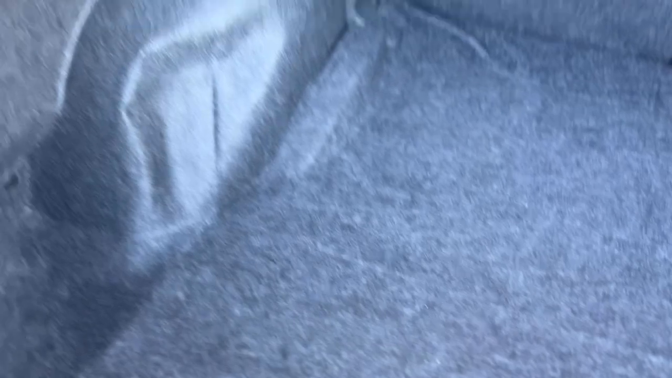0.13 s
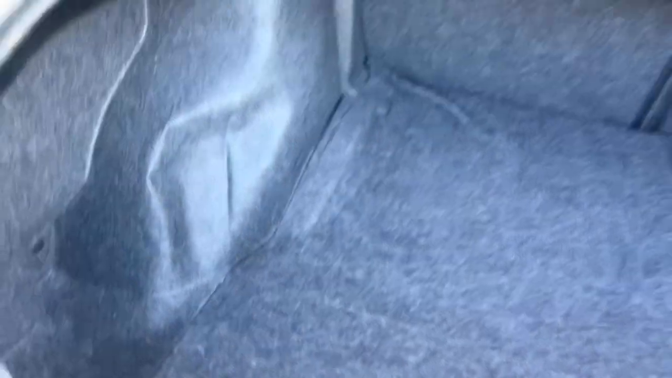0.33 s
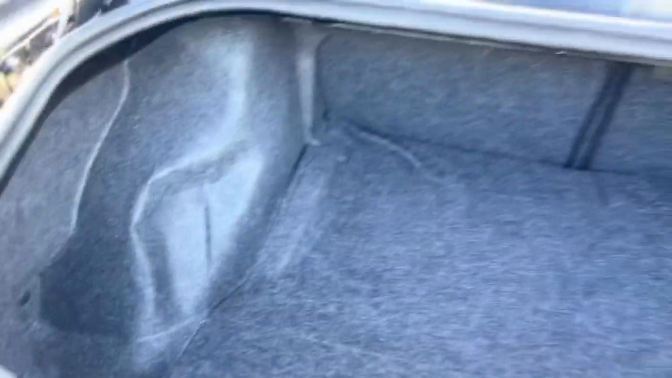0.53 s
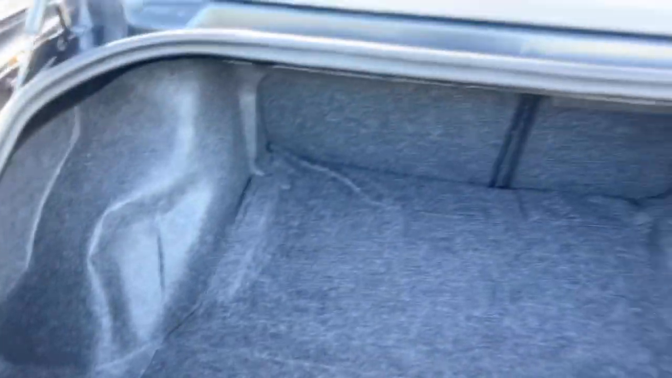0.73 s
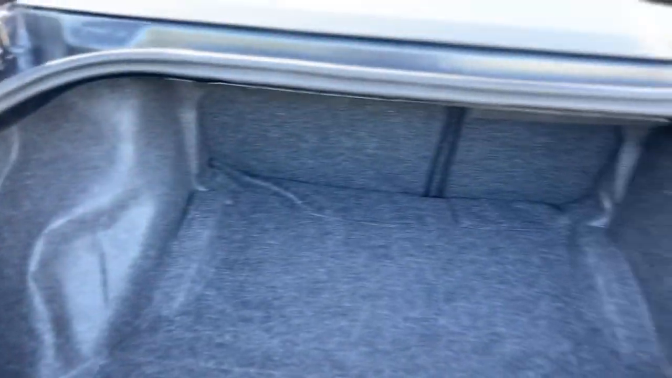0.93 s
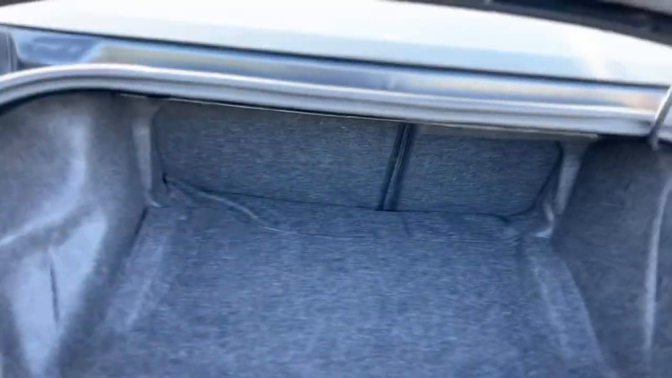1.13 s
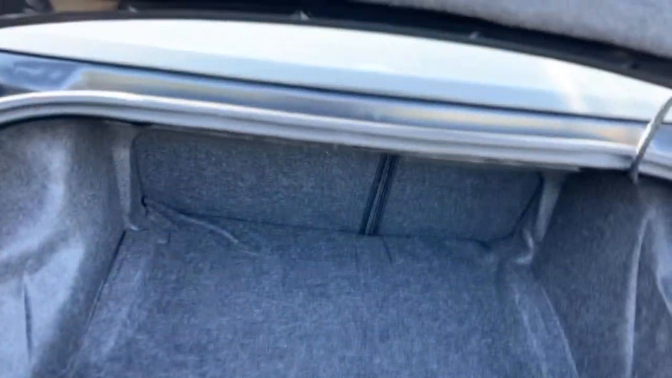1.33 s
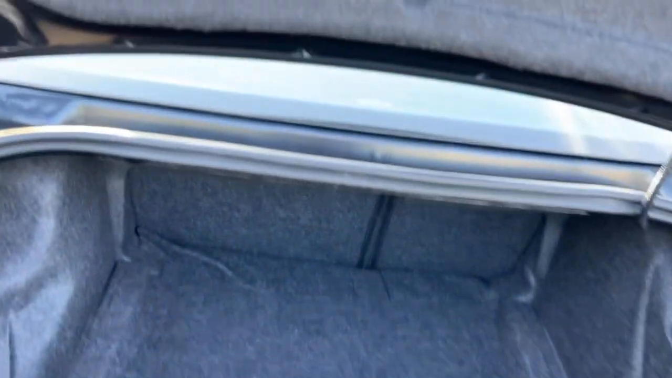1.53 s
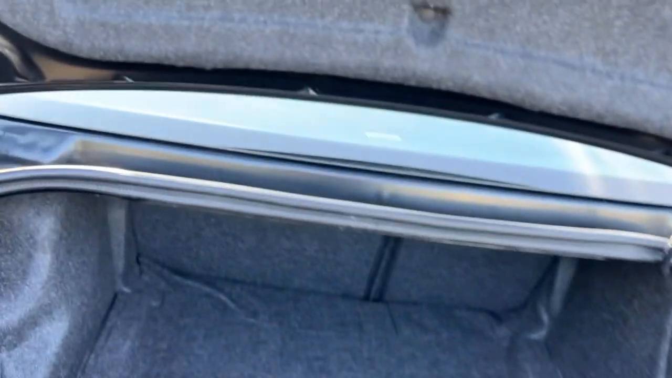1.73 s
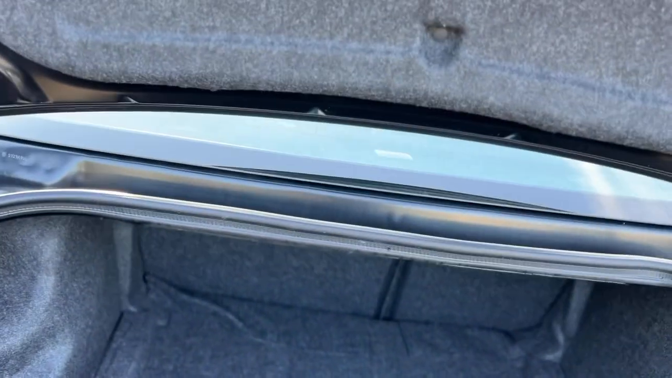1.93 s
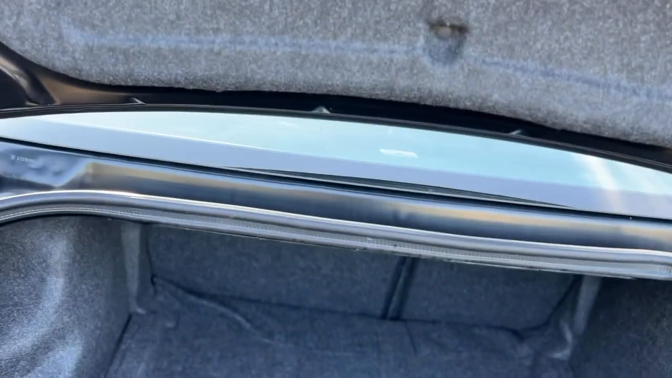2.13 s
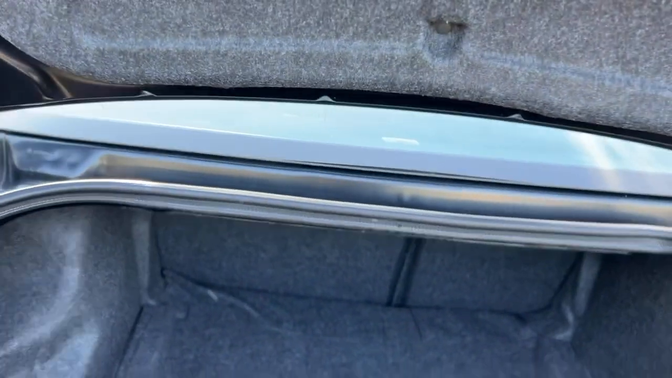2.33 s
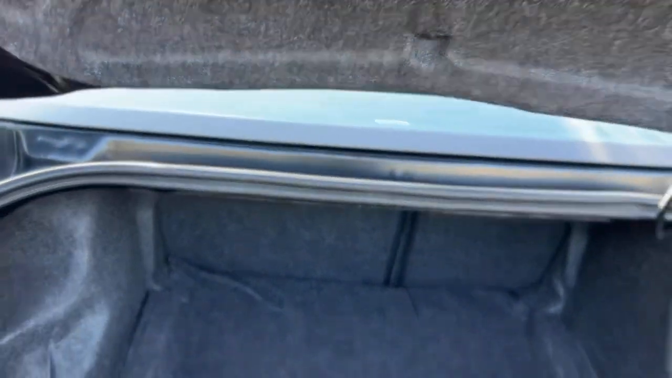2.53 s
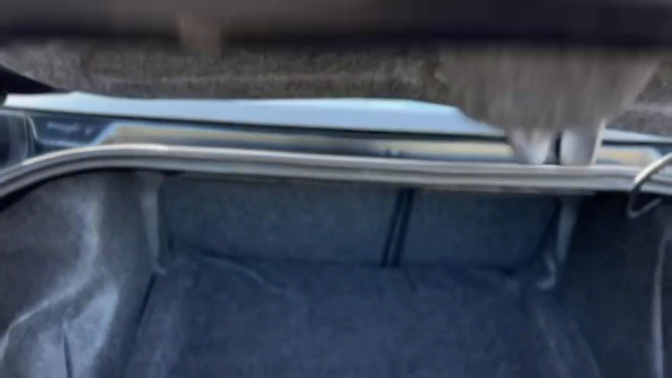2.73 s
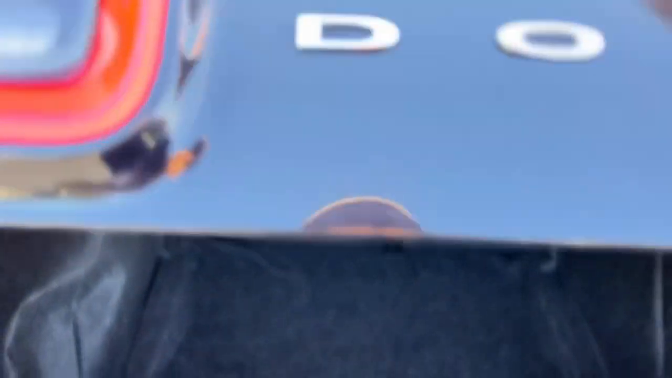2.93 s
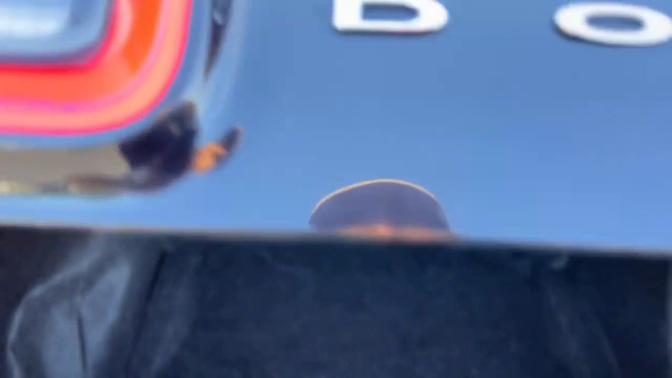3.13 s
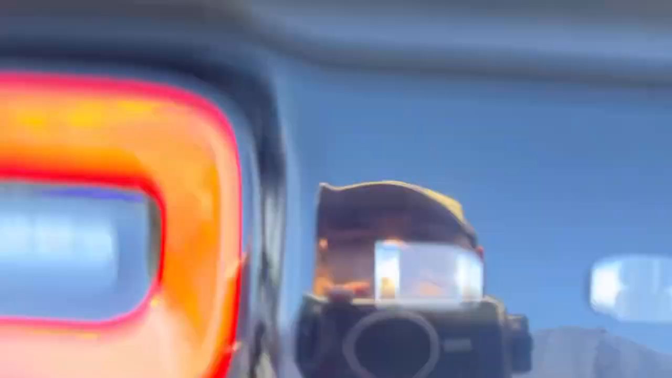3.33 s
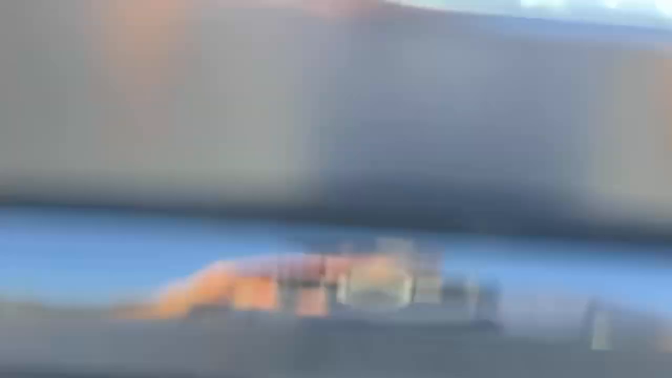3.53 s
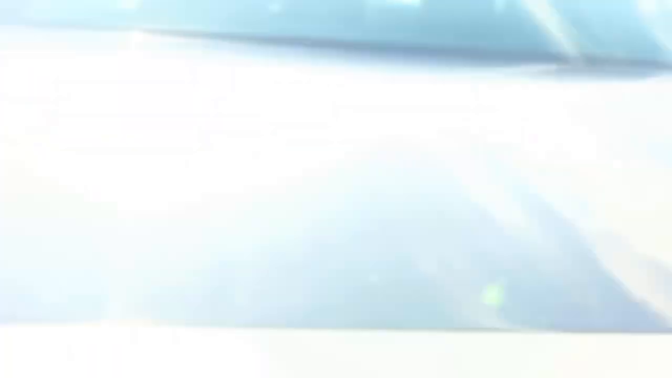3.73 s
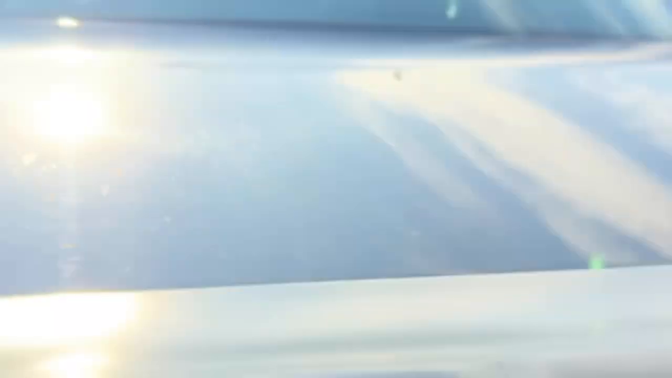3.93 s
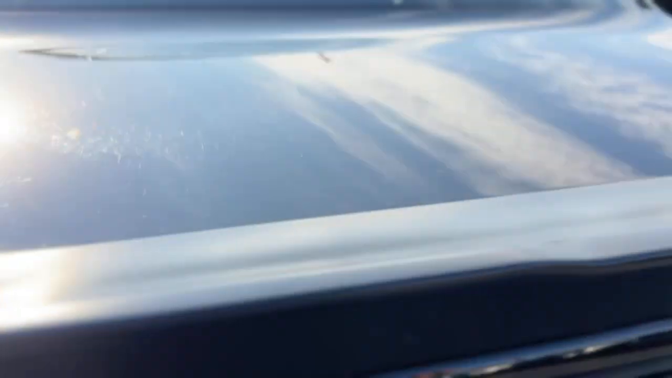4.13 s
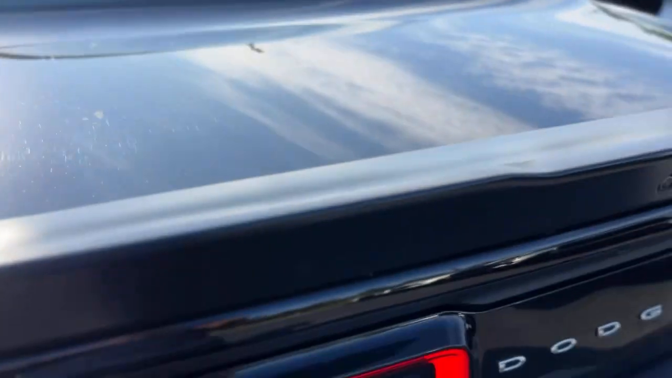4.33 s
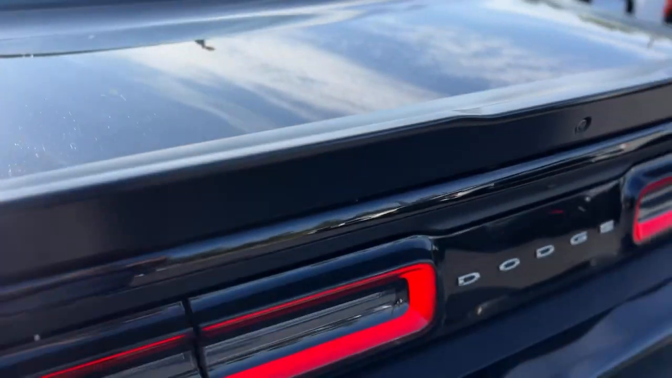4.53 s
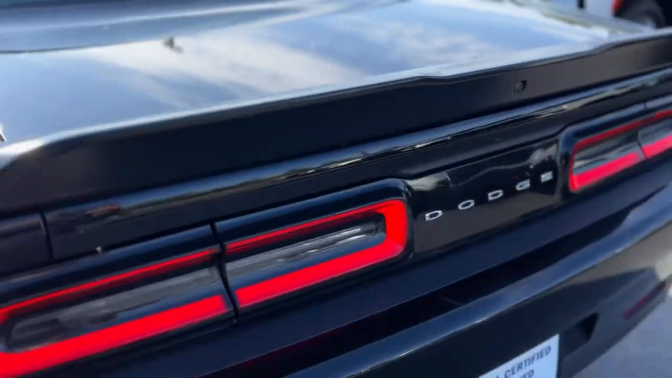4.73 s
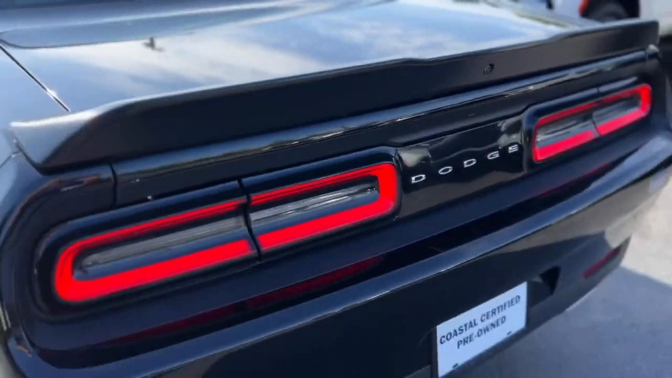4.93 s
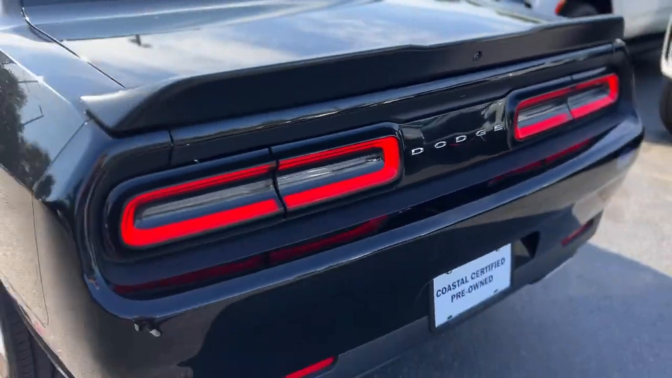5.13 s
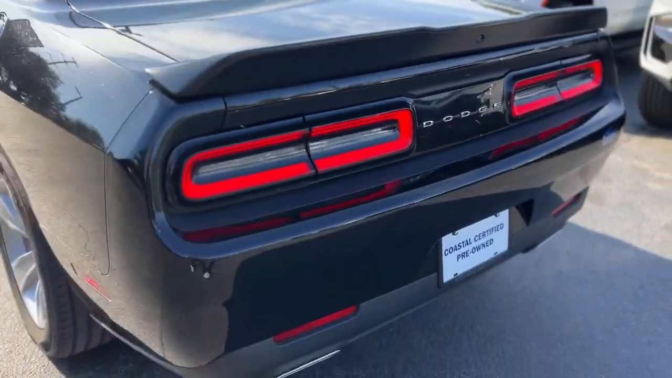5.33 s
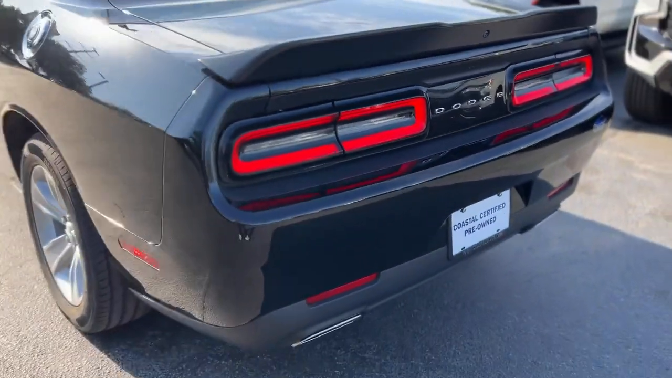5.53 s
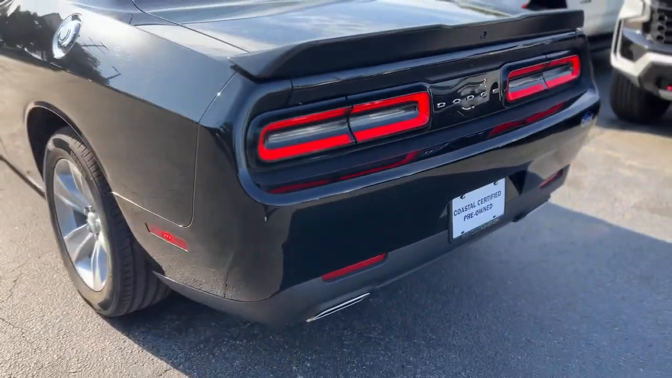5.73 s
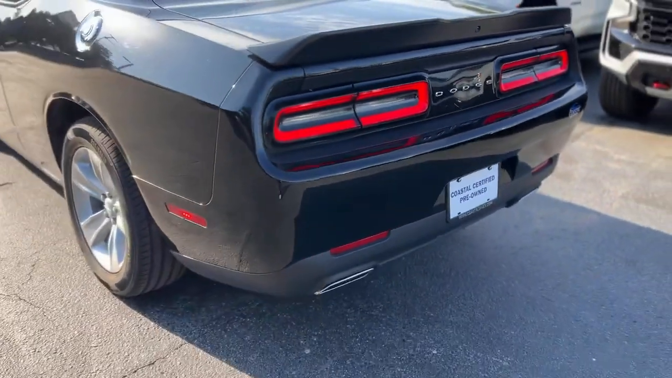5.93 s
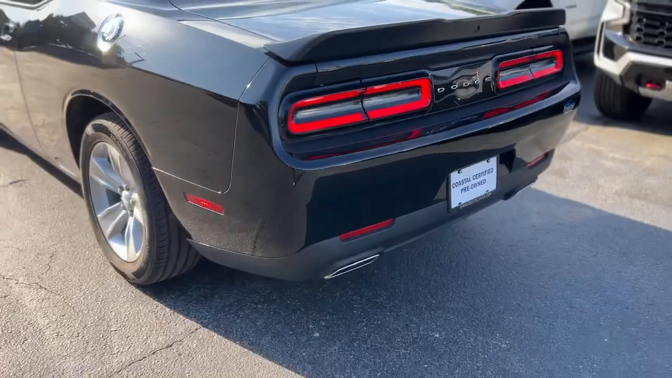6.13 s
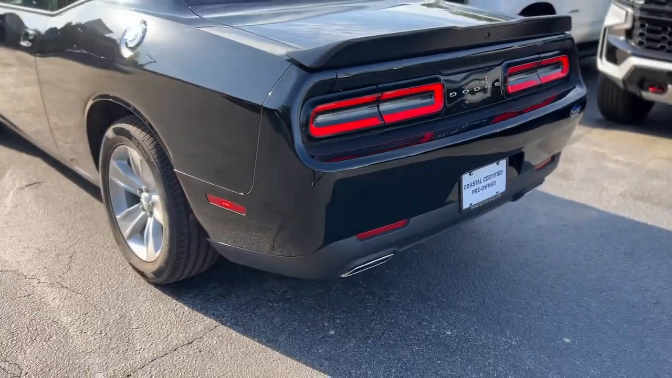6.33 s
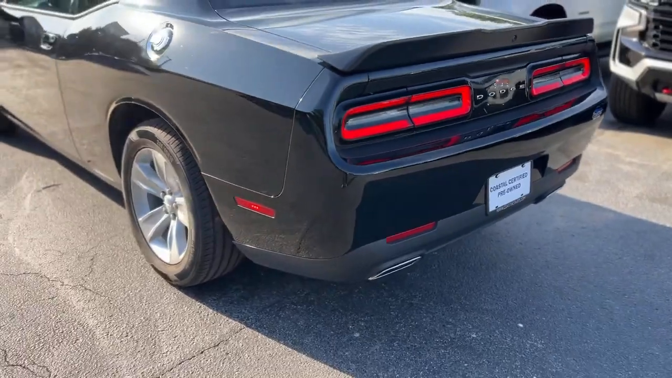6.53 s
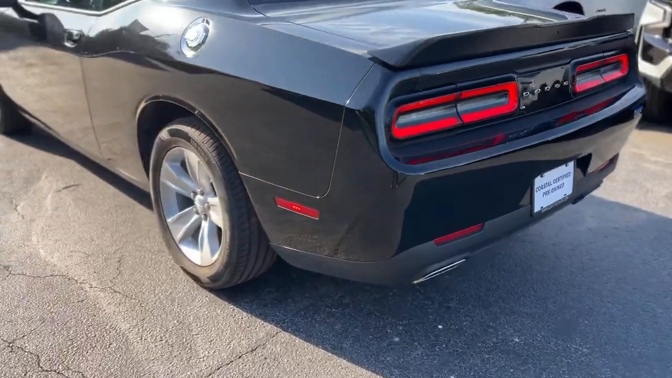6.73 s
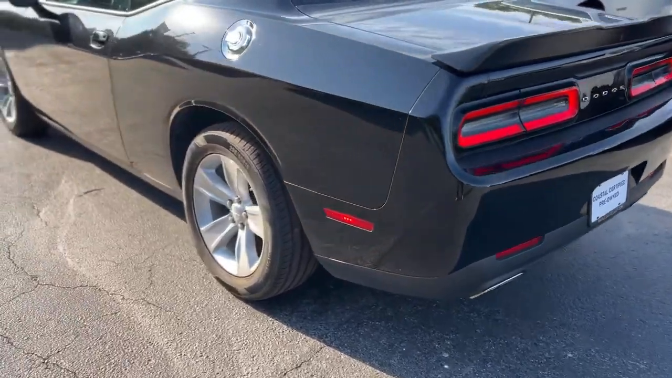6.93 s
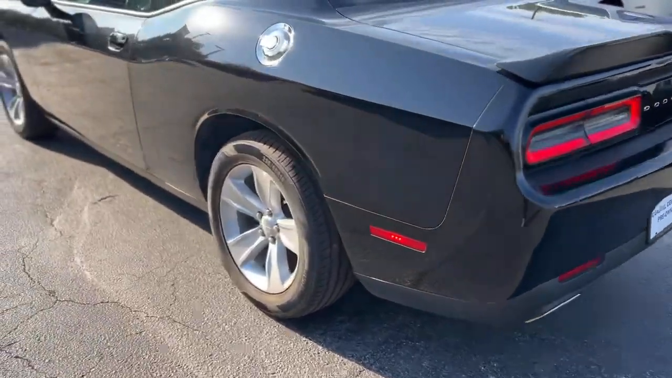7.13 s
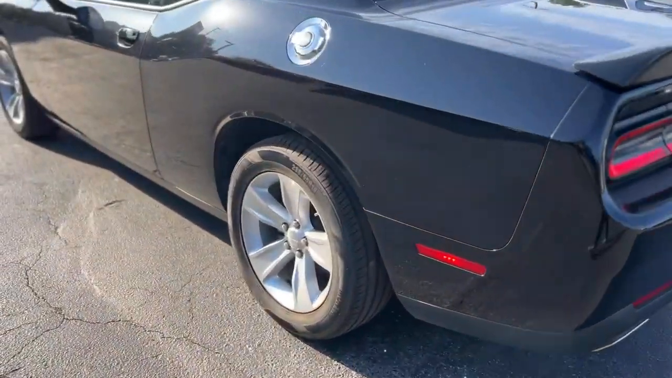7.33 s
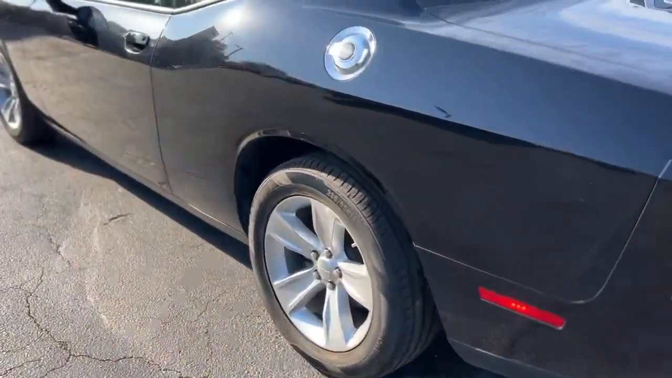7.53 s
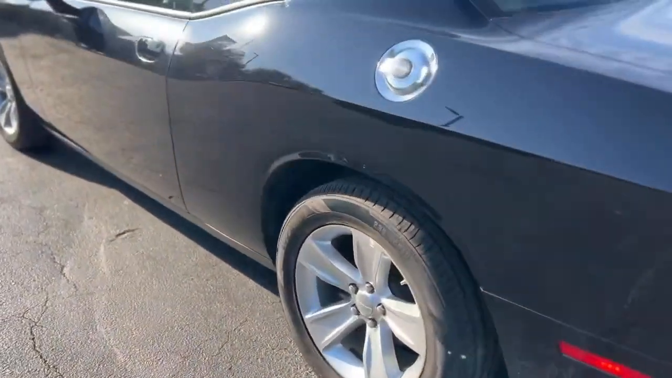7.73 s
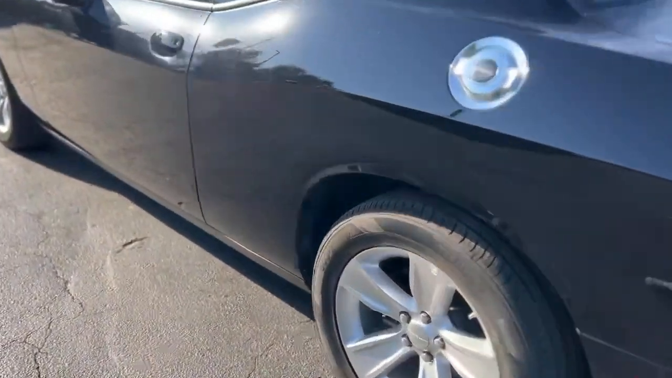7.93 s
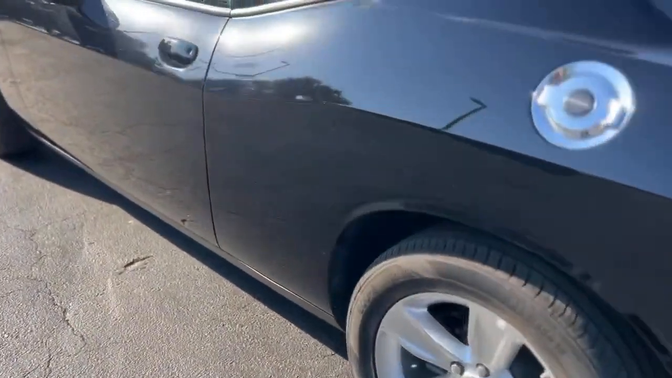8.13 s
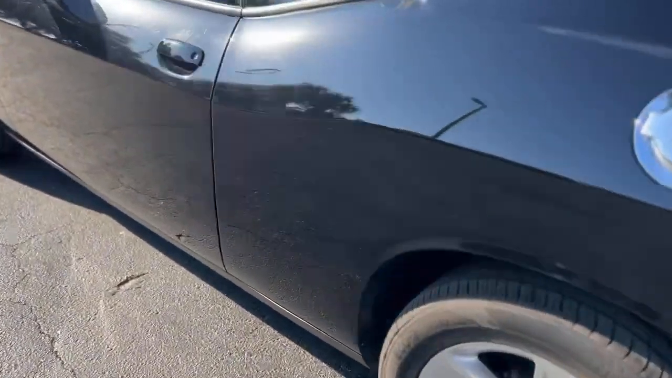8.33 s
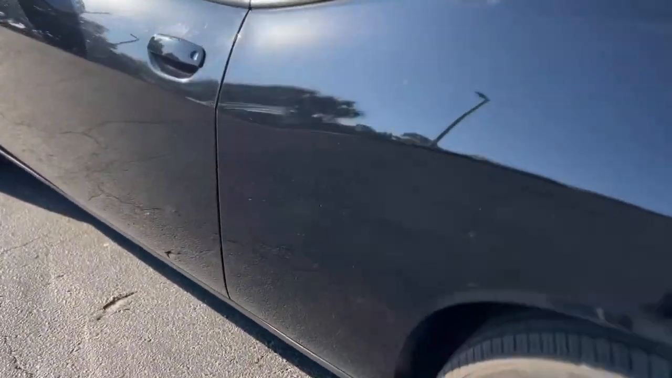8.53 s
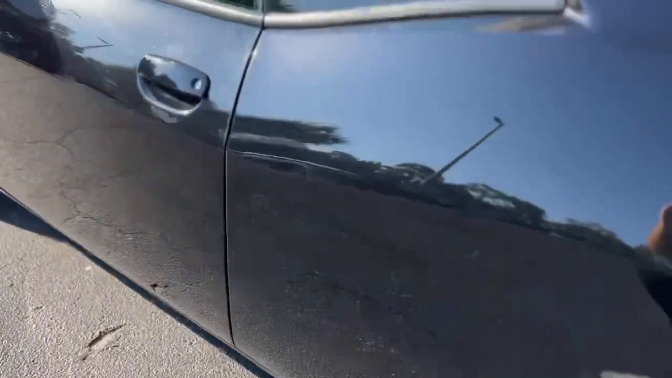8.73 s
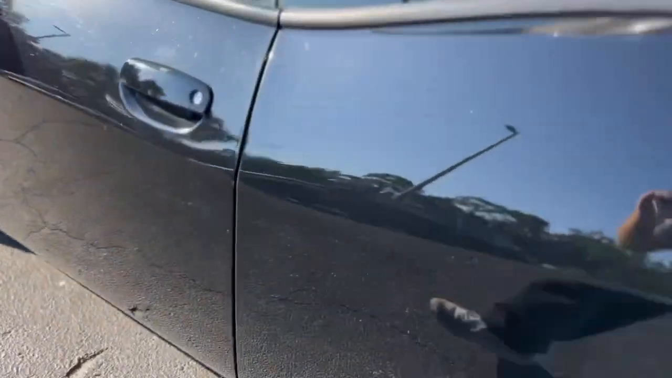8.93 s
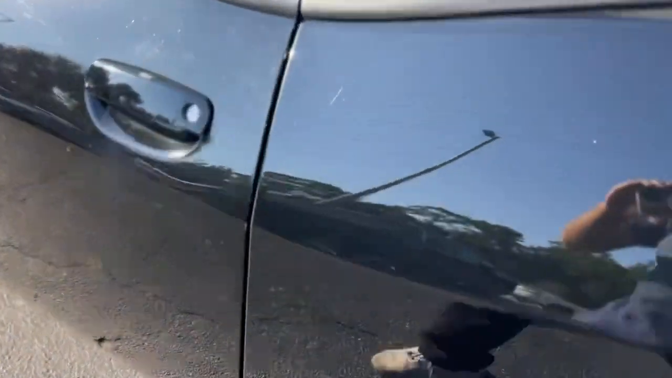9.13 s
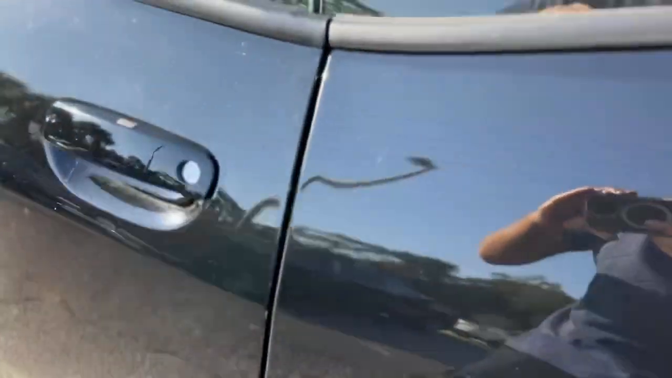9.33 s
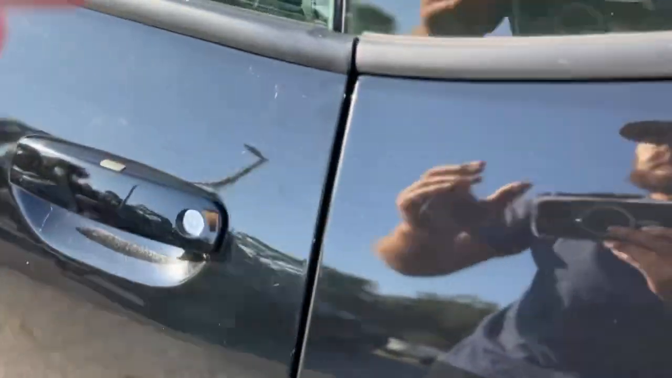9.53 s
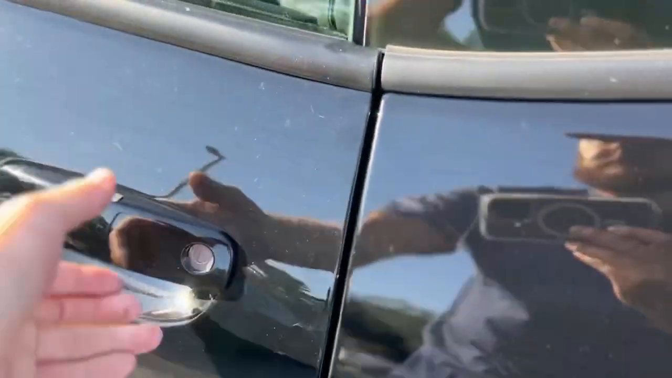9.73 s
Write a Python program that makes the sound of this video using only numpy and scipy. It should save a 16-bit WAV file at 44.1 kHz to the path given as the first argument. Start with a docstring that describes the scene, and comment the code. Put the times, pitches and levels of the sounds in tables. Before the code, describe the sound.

A hand-held microphone at an open car trunk picks up low distant traffic, faint vehicle hum and soft air thumps. Small clicks and hollow ticks come from the hinge and trim. Then the lid slams: a loud, dense thud with metallic clang and latch clank, shuddering briefly. Afterward come a few low wind buffets, and quiet traffic with a faint idling engine continues outdoors.

```python
"""Distant traffic, an idling engine and soft buffets of air on a hand-held microphone, with small clicks;
then a car's trunk lid is slammed: latch meets striker, the lid bottoms on its seal, panels and trim shudder.
Traffic and breeze are coloured noise under slow gains, engines are wavering sines, buffets are short eddies.
Clicks are noise snaps over damped modes; the slam stacks noise bursts, ringing lid modes and a push of air."""
import sys
import numpy as np
from scipy import signal
from scipy.fft import rfft, irfft
from scipy.io import wavfile
from scipy.ndimage import uniform_filter1d

SR = 44100
rng = np.random.default_rng(int(sys.argv[2]) if len(sys.argv) > 2 else 0)


def master(y):
    """Save y as 16-bit WAV."""
    cut = np.clip(np.atleast_2d(y).T, -1, 1)
    pcm = np.round(cut * 32767)  # scale
    wavfile.write(sys.argv[1], SR, pcm.astype(np.int16))


N = 435708
TIME = np.arange(N) / SR


def amp(db):
    """Turns decibels into gain."""
    return 10 ** (np.asarray(db) / 20)


def unit(x):
    """Scales a sound to rms 1."""
    return x / np.sqrt(np.mean(x ** 2) + 1e-20)


def read(points, hz):
    """Reads a spectrum table on a log-frequency axis."""
    f, value = np.transpose(points)
    return np.interp(np.log(hz + 1), np.log(f + 1), value)


def add(mix, s, sound):
    """Mixes a sound in, starting at s seconds."""
    part = mix[round(s * SR):][:len(sound)]
    part += sound[:len(part)]


def noise(colour, size, tilt_db=0):
    """Noise of rms 1 with the given spectrum, tilted by tilt_db per octave above 1 kHz."""
    hz = np.fft.rfftfreq(size, 1 / SR)
    octaves = np.log2(np.maximum(hz, 1000) / 1000)
    spectrum = rfft(rng.standard_normal(size))
    return unit(irfft(spectrum * amp(read(colour, hz) + tilt_db * octaves), size))


def drift(per_s):
    """Slow random wander of rms 1: white noise averaged twice over 1 / per_s seconds."""
    width = max(int(SR / per_s), 1)
    smooth = uniform_filter1d(rng.standard_normal(N), width, mode="wrap")
    return unit(uniform_filter1d(smooth, width, mode="wrap"))


def swell(s, length):
    """A bell-shaped gain that peaks at s; over its length it stays above 0.6."""
    return np.exp(-2 * ((TIME - s) / length) ** 2)


def dying(t, t60):
    """Exponential decay by 60 dB in t60 seconds."""
    return np.exp(-np.log(1000) * t / t60)


def ring(modes, t):
    """Damped resonances, each a dying sine; neighbours start in opposite directions."""
    out = 0
    for k, (hz, db, t60) in enumerate(modes):
        out = out + (-1) ** k * amp(db) * dying(t, t60) * np.sin(2 * np.pi * hz * t)
    return out


# Start and end of each of the microphone's four moves, alternating, in seconds.
MOVES_S = [1.0, 1.7, 3.4, 4.3, 6.6, 8.2, 8.8, 9.4]


def place():
    """Where the microphone is, counted along its five resting places."""
    return np.interp(TIME, MOVES_S, [0, 1, 1, 2, 2, 3, 3, 4])


# Street levels inside the trunk, under the lid, behind the car, beside it and at the door.
# Each row: traffic roar in dB, tyre hiss in dB, street rumble in dB.
PLACE_LEVELS = [(-53, -68, -54.5), (-51.5, -67.5, -52.5), (-55, -73, -57.5), (-52.5, -70, -57),
                (-52.5, -69.8, -59)]


def street_levels():
    """Roar, hiss and rumble in dB, blended along the microphone's way."""
    where = place()
    return [np.interp(where, np.arange(len(PLACE_LEVELS)), db) for db in np.transpose(PLACE_LEVELS)]


# Colour of the traffic as the car's body screens and reflects it, at the five places in turn.
# Each row: frequency in Hz, relative level in dB per Hz.
INSIDE_COLOUR = [(180, -42), (300, -12), (391, -11), (453, -4), (492, -7.5), (1020, -6), (1240, -12),
                 (1370, -9), (1560, -15), (2360, -18), (3630, -30.5), (15500, -52.5)]
UNDER_LID_COLOUR = [(180, -24), (300, -6), (348, -12), (397, -12.5), (439, -2.5), (476, -7), (610, -4),
                    (708, -3), (1120, -4), (1370, -9.5), (1490, -15.5), (2360, -21), (3690, -32.5),
                    (5050, -40.5), (15500, -57)]
BEHIND_COLOUR = [(180, -33), (300, -4.5), (360, -9.5), (417, -3), (476, -6.5), (953, -1.5), (1810, -12.5),
                 (2140, -17), (2520, -19), (3870, -32), (5050, -32), (15500, -47.5)]
BESIDE_COLOUR = [(180, -35), (300, -1), (337, -8), (372, -1.5), (397, -7), (453, -6), (492, -7.5),
                 (610, -2.5), (877, -2.5), (1160, -1), (2170, -14), (3940, -31.5), (8700, -35.5),
                 (15500, -46)]
AT_DOOR_COLOUR = [(180, -40), (300, -5), (366, -0.5), (431, -8), (600, 0), (863, -1), (1030, -3),
                  (1200, -3.5), (2520, -22), (2980, -24.5), (3230, -28.5), (8560, -40.5), (15500, -48)]
# Cars going by on the far road.
# Each row: peak in seconds, length in seconds, lift of the roar in dB, lift of the tyre hiss in dB.
CAR_PASSES = [(.62, 0.26, 1.8, 1), (1.75, 0.48, 1.5, 1.9), (2.55, 0.87, 0, 2.5), (3.85, 0.52, 2, 0)]


def traffic():
    """Roar and tyre hiss lift as cars go by, and change colour as the microphone moves round the car."""
    roar_db, hiss_db, _ = street_levels()
    for s, length, roar_lift_db, hiss_lift_db in CAR_PASSES:
        bell = swell(s, length)
        roar_db = roar_db + roar_lift_db * bell
        hiss_db = hiss_db + hiss_lift_db * bell
    roar_gain = amp(roar_db + 0.52 * drift(17))
    hiss_gain = amp(hiss_db + 0.54 * drift(9.4))

    split = signal.butter(4, 2100, fs=SR, output="sos")  # roar below 2100 Hz, hiss above
    out, where = np.zeros(N), place()
    colours = [INSIDE_COLOUR, UNDER_LID_COLOUR, BEHIND_COLOUR, BESIDE_COLOUR, AT_DOOR_COLOUR]
    for k, colour in enumerate(colours):
        wash = noise(colour, N)
        roar = signal.sosfiltfilt(split, wash)
        hiss = wash - roar
        nearness = np.sqrt(np.maximum(1 - abs(where - k), 0))  # equal-power crossfade
        out += nearness * (roar_gain * unit(roar) + hiss_gain * unit(hiss))
    return out


# Spectra of the gusts and of the street rumble.
# Each row: frequency in Hz, relative level in dB per Hz.
GUST_COLOUR = [(15, -6), (40, 0.5), (70, 3), (110, -4.5), (250, -28), (800, -61.5)]
RUMBLE_COLOUR = [(60, -24), (95, 2), (130, 1.5), (175, -2), (260, -8), (500, -20.5), (1200, -63)]
# The air stirring as the microphone is carried about.
# Each row: peak in seconds, length in seconds, level in dB.
GUST_SWELLS = [(0.357, 0.27, -54.5), (.8, .5, -55.5), (1.28, 0.23, -52.5), (1.772, 0.47, -54),
               (3.35, 0.41, -56.5), (4.453, 0.14, -50), (4.717, 0.11, -51), (5.045, 0.38, -55),
               (5.75, 0.64, -57.5), (7.25, 0.55, -62), (9.2, 1, -62.5)]
CALM_DB, GUST_RUMBLE_DB = -63.5, -1  # air between gusts; rumble a gust raises, relative to the gust


def breeze():
    """Lumpy gusts on the microphone over the steadier street rumble, which each gust lifts a little."""
    _, _, street_db = street_levels()
    stir = sum(amp(db) * swell(s, length) for s, length, db in GUST_SWELLS)
    # powers add, so gains combine as a hypotenuse
    gust_gain = np.hypot(amp(CALM_DB), stir) * amp(1.5 * drift(22))
    rumble_gain = np.hypot(amp(street_db), amp(GUST_RUMBLE_DB) * stir) * amp(1.4 * drift(18))
    return noise(GUST_COLOUR, N) * gust_gain + noise(RUMBLE_COLOUR, N) * rumble_gain


def engine(hz, gain, waver):
    """One sine line of an engine; waver is the rms share by which its pitch wanders."""
    turns = np.cumsum(hz * (1 + waver * drift(12.5))) / SR
    flutter = amp(2 * drift(13))
    return np.sqrt(2) * gain * flutter * np.sin(2 * np.pi * turns)


# An idling engine, heard more or less as the car screens it.
# Each row: time in seconds, level in dB.
IDLE_LEVEL = [(0, -77), (3.3, -66), (5, -57), (6.2, -63.5), (7.2, -60), (8, -55.5), (9.88, -63)]
IDLE_HZ = 103.7
# Engine notes of far vehicles.
# Each row: peak in seconds, length in seconds, pitch at the peak in Hz, level in dB.
FAR_NOTES = [(.08, 0.29, 463, -60), (0.601, 0.86, 318, -60.5), (1.749, 0.43, 444, -56.5),
             (2.152, 0.45, 439, -60.5), (.2, 0.55, 161, -59), (2.104, 1.1, 123.9, -56),
             (2.1, 1.1, 312.7, -67.5)]
NOTE_SAG_PER_S = 0.022  # the vehicles slow: share of the pitch lost each second


def engines():
    """One engine idles around a steady pitch; the notes of others swell and fade, sinking as they slow."""
    idle_db = np.interp(TIME, *np.transpose(IDLE_LEVEL))
    out = engine(IDLE_HZ, amp(idle_db), waver=0.021)
    for s, length, hz, db in FAR_NOTES:
        sinking_hz = hz * np.exp(-NOTE_SAG_PER_S * (TIME - s))
        out += engine(sinking_hz, amp(db) * swell(s, length), waver=0.007)
    return out


# Buffets of air on the microphone.
# Each row: centre in seconds, level in dB, pitch in Hz.
AIR_BUFFETS = [(1.155, -35.5, 86), (1.212, -36, 109), (1.235, -36, 120), (1.276, -34.5, 140),
               (1.364, -39.5, 110), (1.420, -37, 130), (1.674, -35.5, 103), (1.752, -37, 149.4),
               (1.769, -41, 168), (1.872, -45, 150), (4.398, -49, 70), (4.4265, -32.5, 101),
               (4.473, -28.5, 134), (4.524, -40.5, 193), (4.662, -31.5, 191), (4.685, -36, 169),
               (4.711, -33.5, 250), (4.7289, -28.5, 134), (4.7481, -33, 161), (5.081, -42, 118),
               (5.551, -40.5, 192), (5.677, -37, 106.6), (5.697, -35.5, 190), (5.983, -39, 91),
               (6.01, -31.5, 178)]


def buffets():
    """Each eddy presses, sucks and presses again on the microphone: about one and a half soft cycles."""
    out, t = np.zeros(N), np.arange(-(SR // 20), SR // 20) / SR
    for s, db, hz in AIR_BUFFETS:
        turns = hz * t
        eddy = -np.cos(2 * np.pi * turns) - 0.15 + 0.31 * noise(THUD_COLOUR, len(t))
        envelope = np.exp(-(turns / 0.76) ** 2)
        add(out, s + t[0], amp(db) * eddy * envelope)
    return out


# Small clicks of hinge, trim and grit.
# Each row: start in seconds, level in dB, hollow knock share in dB, treble tilt of the snap in dB per octave.
SMALL_CLICKS = [(1.1680, -65.5, -20, 11), (1.9560, -57.5, -2, -2), (2.003, -68, -12, 4),
                (2.0878, -46.5, 14, -1.5), (2.1040, -65, 9, 4), (2.6696, -49.5, -1, -1.5),
                (2.706, -53.5, 7, -6), (2.7340, -50, -11, -7), (3.5068, -61.5, -20, 20),
                (4.0757, -68.5, -20, 5), (5.4386, -65, -20, -3), (7.375, -66.5, 16, -6),
                (7.5550, -72, -20, 9), (8.6907, -68, -20, 8), (9.1522, -70, -20, 18), (9.3946, -71, -15, 7)]
# Spectrum of the snap. Each row: frequency in Hz, relative level in dB per Hz.
SNAP_COLOUR = [(400, -16), (1200, 2.5), (3200, 0.5), (6000, -3.5), (9000, -16), (15000, -29)]
# Resonances of the hollow knock. Each row: frequency in Hz, level in dB, 60 dB decay time in seconds.
KNOCK_MODES = [(600, -4.5, 0.036), (754, -3.5, 0.081), (942, -1, 0.073), (1064, 4.5, 0.03),
               (1530, -8, 0.042), (2380, -18, .04), (3150, -13, 0.033)]


def clicks():
    """Each click is a snap of noise with a short hollow knock of damped modes under it."""
    out, t = np.zeros(N), np.arange(SR // 8) / SR
    attack = 1 - np.exp(-t / 0.00014)
    snap_decay = dying(t, 0.037) + amp(-16) * dying(t, 0.18)
    for s, db, knock_db, tilt_db in SMALL_CLICKS:
        snap = amp(2.5) * noise(SNAP_COLOUR, len(t), tilt_db) * snap_decay
        knock = amp(knock_db) * ring(KNOCK_MODES, t)
        add(out, s, amp(db) * (snap + knock) * attack)
    return out


# How long the panels shudder. Each row: frequency in Hz, 60 dB decay time in seconds.
PANEL_DECAY = [(60, 0.49), (200, 0.39), (600, 0.33), (1800, 0.35), (5000, 0.33), (13000, 0.17)]


def contact(colour, t, rise, burst_t60, tail_db):
    """A short burst of crowded panel modes, then their weaker tail, in which the top treble dies first."""
    hz, at, z = signal.stft(noise(colour, len(t)), SR, nperseg=512)
    fading = z * dying(at, read(PANEL_DECAY, hz)[:, None])
    tail = signal.istft(fading, SR, nperseg=512)[1][:len(t)]
    attack = 1 - np.exp(-t / rise)  # rise in seconds
    shape = attack * dying(t, burst_t60)
    # the blow sets the energy, whatever the noise draw
    burst = unit(noise(colour, len(t)) * shape) * np.sqrt(np.mean(shape ** 2))
    return burst + amp(tail_db) * attack * tail


def chatter(size, depth_db):
    """Loose parts touch unevenly: a gain that jumps about from millisecond to millisecond."""
    return amp(depth_db * unit(uniform_filter1d(rng.standard_normal(size), size=50)))


# The latch meets the striker and the lid bottoms on its seal.
# Each row: start in seconds, then levels in dB of the body's thud, the sheet metal's clang,
# the latch's clank and the trim's rattle.
SLAM_BLOWS = [(3.7490, -33, -32, -49, -54), (3.7518, -28, -22.5, -31.5, -39),
              (3.7613, -20, -10.5, -28.5, -28.5), (3.7660, -36, -15, -38, -31),
              (3.7703, -16, -11.5, -29, -42)]
# The shut lid shuddering against its latch.
# Each row: start in seconds, thud level in dB, clank level in dB.
LID_REBOUNDS = [(3.7857, -27, -31.5), (3.7913, -21, -31), (3.814, -29, -33), (3.822, -30, -29.5),
                (3.8276, -36, -37), (3.8432, -23.5, -36), (3.8710, -28.5, -45), (3.8890, -41, -41.5),
                (3.9290, -41, -55), (3.9760, -39.5, -61), (4.0050, -67, -54)]
REBOUND_CLANG_DB, REBOUND_RATTLE_DB = 3, -7.5  # sheet metal and trim, relative to a rebound's clank
# Ringing of the lid and the trunk cavity.
# Each row: frequency in Hz, relative level in dB, 60 dB decay time in seconds.
LID_MODES = [(59, -18, 0.36), (112.2, 1, 0.43), (147.8, 1, 0.49), (169.5, -3, 0.54), (222.7, -1, 0.32),
             (261, 0, 0.27), (371, -2.5, 0.38), (439, -7.5, 0.47), (535, 4.5, 0.27), (618, -6, 0.24),
             (744, -6, 0.22), (844, -12, 0.36), (1010, -13, 0.24), (1036, -15, 0.49), (1206, -19, 0.55),
             (1270, -24, .18), (1458, -15, .19), (1646, -13, 0.21), (1780, -14, 0.25), (1890, -13, 0.26),
             (2330, -16, 0.3), (2589, -20, 0.19)]
# Spectra of body, sheet metal, latch and trim in contact; the thud also roughens the buffets.
# Each row: frequency in Hz, relative level in dB per Hz.
THUD_COLOUR = [(20, -22), (50, 5), (85, -5), (130, 1), (330, 0), (550, -9.5), (800, -22), (1500, -45),
               (4000, -70)]
CLANG_COLOUR = [(100, -31), (280, -10), (460, 0.5), (750, -8.5), (1000, -8.5), (1350, -11), (1800, -20.5),
                (2750, -32), (3300, -48), (8000, -52)]
CLANK_COLOUR = [(700, -3.5), (1400, 0.5), (1800, 1), (2250, -5), (2750, -6), (3250, -21), (8000, -43)]
RATTLE_COLOUR = [(600, -23), (2500, 3), (3300, -0.5), (4700, 4), (6000, 0), (7500, -6), (11000, -12.5),
                 (15500, -16)]


def slam():
    """Contacts thud, clang, clank and rattle; the closing blow rings the lid and squeezes the trunk's air."""
    out, t = np.zeros(N), np.arange(SR * 3 // 4) / SR
    shudder = [(s, thud_db, clank_db + REBOUND_CLANG_DB, clank_db, clank_db + REBOUND_RATTLE_DB)
               for s, thud_db, clank_db in LID_REBOUNDS]
    for s, thud_db, clang_db, clank_db, rattle_db in SLAM_BLOWS + shudder:
        body = amp(thud_db) * contact(THUD_COLOUR, t, rise=0.00075, burst_t60=0.07, tail_db=-11.0)
        sheet = amp(clang_db) * contact(CLANG_COLOUR, t, rise=0.00022, burst_t60=0.041, tail_db=-17.5)
        latch = amp(clank_db) * contact(CLANK_COLOUR, t, rise=0.0003, burst_t60=0.073, tail_db=-17.5)
        trim = amp(rattle_db) * contact(RATTLE_COLOUR, t, rise=0.0018, burst_t60=0.052, tail_db=-18.5)
        add(out, s, body + sheet + (latch + trim) * chatter(len(t), depth_db=2.0))

    closed_s = 3.7705
    add(out, closed_s, amp(-24.5) * ring(LID_MODES, t) * (1 - np.exp(-t / 0.0038)))
    # trapped air gives one short push, then escapes through the vents
    swing = t / 0.003
    add(out, closed_s, -amp(-6.0) * swing * (1 - swing / 2) * np.exp(-swing))
    return out


def scene():
    """Mixes background, small sounds and slam in mono."""
    background = traffic() + breeze() + engines()
    return (background + buffets() + clicks() + slam())[None]


def record(dry):
    """The recorder drops the deepest bass (below 22 Hz) and the top of the treble (above 15850 Hz)."""
    bass_cut = signal.butter(2, 22, "highpass", fs=SR, output="sos")
    treble_cut = signal.firwin(511, 15850, window=("kaiser", 9), fs=SR)
    thinned = signal.sosfilt(bass_cut, dry)
    return signal.oaconvolve(thinned, treble_cut[None], "same")


dry = scene()
out = record(dry)
master(out)
```